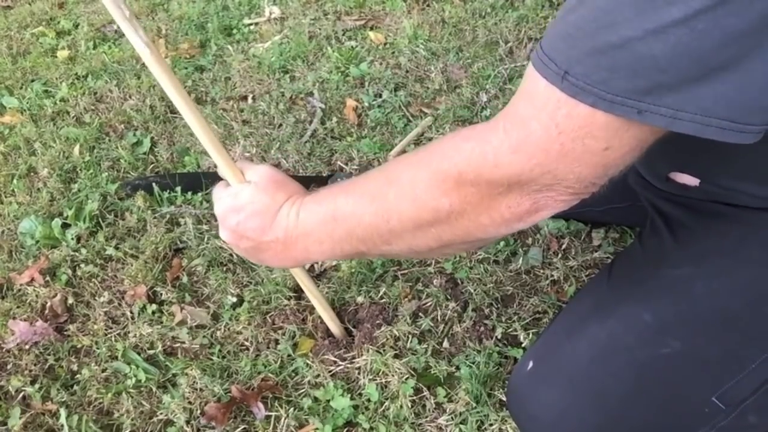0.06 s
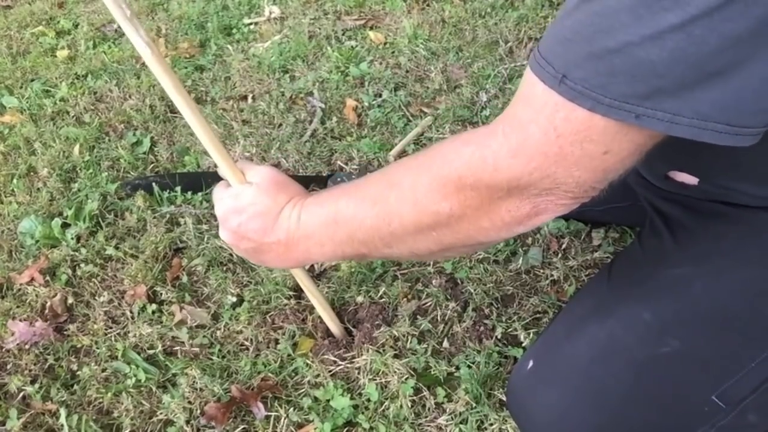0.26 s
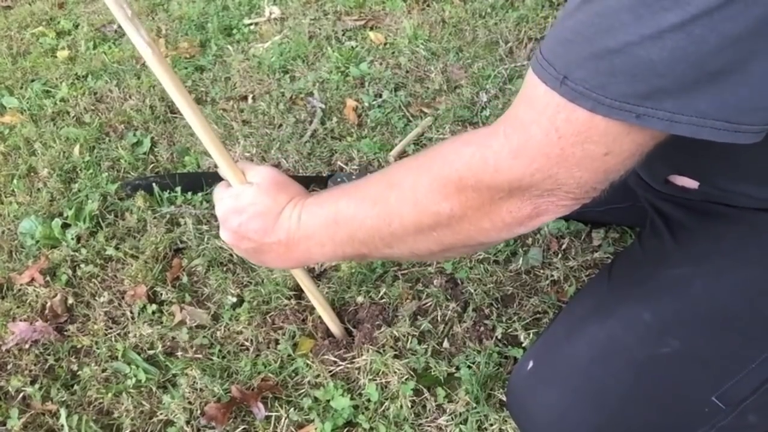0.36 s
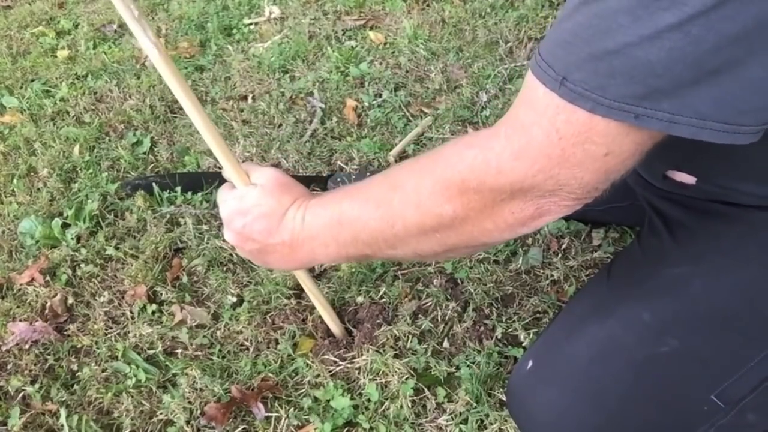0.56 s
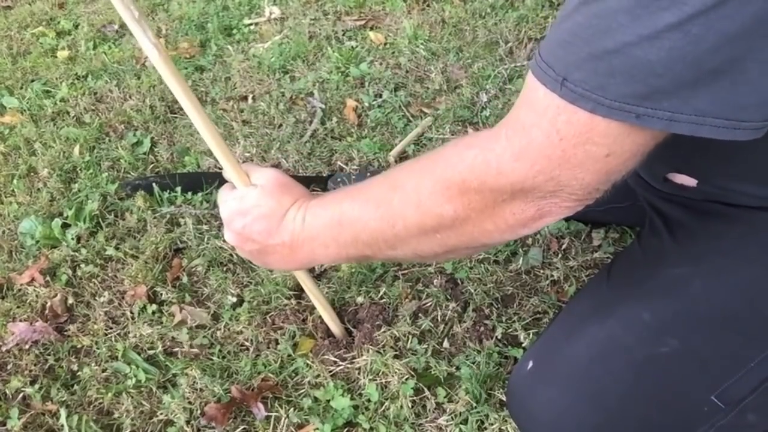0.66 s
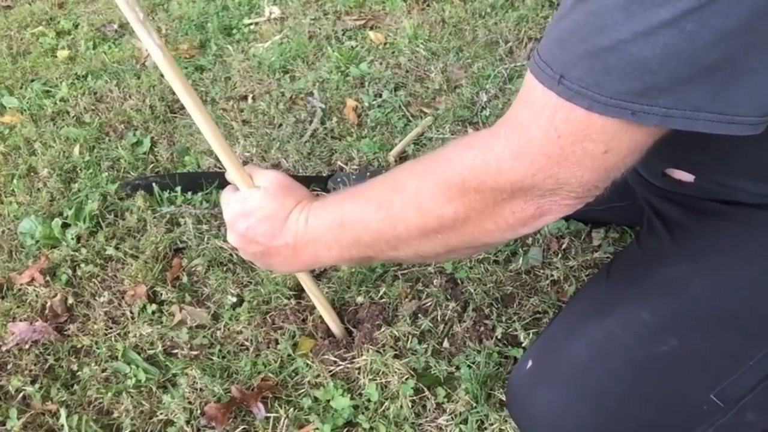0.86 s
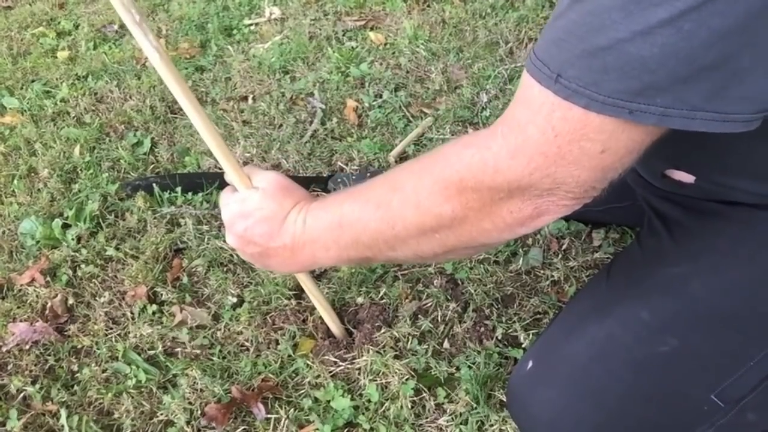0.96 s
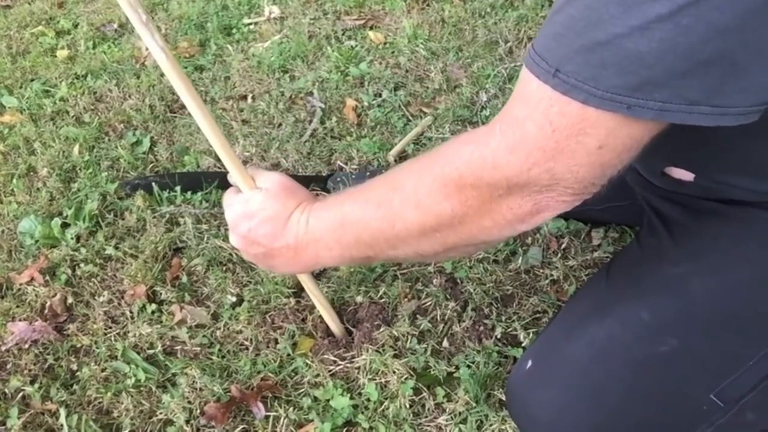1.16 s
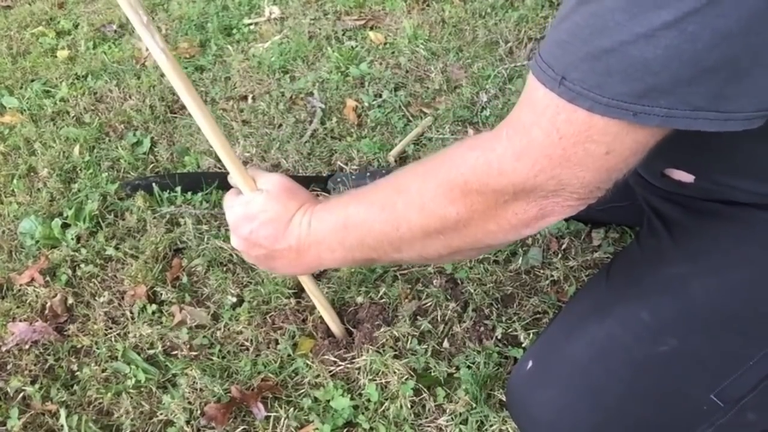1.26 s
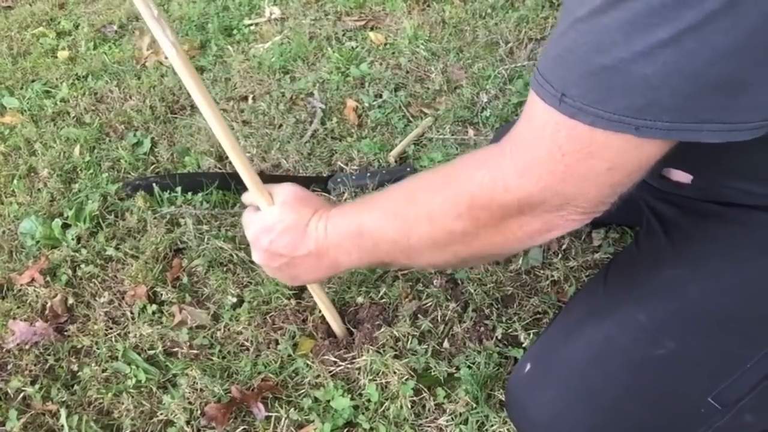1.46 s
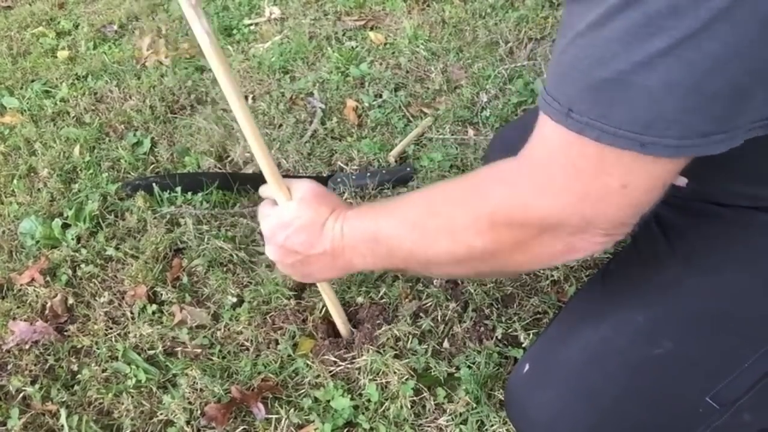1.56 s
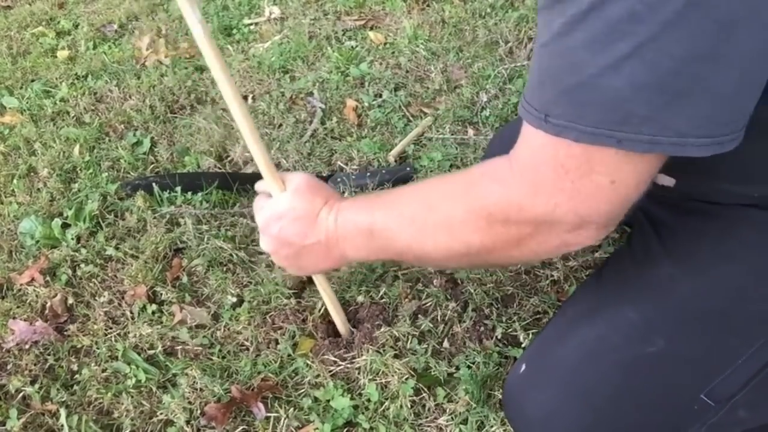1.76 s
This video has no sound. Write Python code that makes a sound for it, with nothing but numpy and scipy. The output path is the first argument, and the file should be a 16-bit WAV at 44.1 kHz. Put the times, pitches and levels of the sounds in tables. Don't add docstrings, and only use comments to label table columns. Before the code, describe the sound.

Four loud dry hammer blows on a wooden stake outdoors, faint rebounds, low gusty wind rumble

```python
import sys
import numpy as np
from scipy import signal
from scipy.io import wavfile
from scipy.ndimage import uniform_filter1d

SR = 44100
rng = np.random.default_rng(int(sys.argv[2]) if len(sys.argv) > 2 else 0)


def pcm_store(signal):
    levels = np.round(np.clip(np.atleast_2d(signal), -1, 1) * 32767)
    wavfile.write(sys.argv[1], SR, levels.astype(np.int16).T)


def volts_from_db(level):
    exponent = np.asarray(level, float) / 20
    return 10 ** exponent


N = 79380


def rms_one(x):
    return x / np.sqrt(np.mean(x ** 2) + 1e-20)


def cut(x, hz, kind, order=2):
    sos = signal.butter(order, np.clip(hz, 10, .45 * SR), kind, fs=SR, output="sos")
    return signal.sosfilt(sos, x)


def level(rows):
    return volts_from_db(np.interp(np.arange(N) / SR, *np.transpose(rows)))


def coloured(spectrum, patchy_db, rate_hz):
    hz, db = np.transpose(spectrum)
    edges_hz = 20 * 2 ** np.arange(0, 10, .5)
    white = rng.standard_normal((2, N + 8000))
    out = 0
    for k, (low, high) in enumerate(zip(edges_hz, edges_hz[1:])):
        knots = rng.standard_normal(200)
        flicker = np.interp(np.arange(N) / SR * rate_hz, np.arange(len(knots)), knots)
        base_db = np.interp(np.log(low * high) / 2, np.log(hz), db, left=-90, right=-90)
        band = cut(white[k % 2], [low, high], "band")[-N:]
        out = out + volts_from_db(base_db + patchy_db * flicker) * band
    return rms_one(out)


# freq_hz, density_db [dB per Hz]
HISS_SPECTRUM = [(290, 4), (500, -10), (1160, -13.5), (2100, -8.5), (4090, -10), (5090, -12.5), (6610, -10),
                 (14700, -24.5), (16000, -29)]
# time_s, level_db
HISS_LEVEL = [(0.0, -43), (0.812, -41.5), (0.912, -43), (1.544, -42.5), (1.8, -41.5)]


def outdoor_hiss():
    return level(HISS_LEVEL) * coloured(HISS_SPECTRUM, patchy_db=-0.67, rate_hz=8.27)


# time_s, level_db
BREEZE_LEVEL = [(0.0, -36), (0.094, -39.5), (0.27, -40), (0.646, -31), (0.776, -40), (0.856, -36),
                (1.016, -27.5), (1.388, -31), (1.604, -35.5), (1.8, -33)]
# freq_hz, density_db [dB per Hz]
BREEZE_SPECTRUM = [(13, -35), (22, 10), (81, 11), (118, 4), (163, -1), (401, -17), (900, -28.5),
                   (1170, -11), (1980, -120)]


def breeze():
    return level(BREEZE_LEVEL) * coloured(BREEZE_SPECTRUM, patchy_db=4.5, rate_hz=20)


def evened(x, window_s):
    evenness = 0.2
    x = rms_one(x)
    power = uniform_filter1d(x ** 2, int(window_s * SR))
    return x / (power + 0.1) ** (evenness / 2)


def lump(t, rise_s, hold_s, tail_s):
    rise = 1 - np.exp(-(t.clip(0) / rise_s) ** 2)
    return rise * np.exp(-(t - hold_s).clip(0) / tail_s)


def eddies(noise, edges_hz, shape, slope_db):
    out = 0
    for k, band_hz in enumerate(zip(edges_hz, edges_hz[1:])):
        band = cut(noise[k % 2], band_hz, "band")[-len(shape):]
        one = evened(band, 2 / band_hz[0]) * shape
        match = np.sqrt(np.sum(shape ** 2) / np.sum(one ** 2))
        out = out + volts_from_db(slope_db * k) * one * match
    return out


THUMP_LOW_HZ, THUMP_TOP_HZ, THUMP_DB = 45.8, 140.4, -9.5
THUMP_RISE_S, THUMP_LAG_S, THUMP_TAIL = .006, 0.0013, 0.44
FLUTTER_LOW_HZ, FLUTTER_TOP_HZ, FLUTTER_DB = 140.7, 680.3, -10.5
FLUTTER_OPENS_HZ_PER_DB = 10.5
FLUTTER_RISE_S, FLUTTER_SHARE, FLUTTER_TAIL = 0.0029, 0.66, .15
# start_s, thump_db, flutter_db, length_s
GUSTS = [(0.104, -23.5, -37, 0.028), (0.132, -22.5, -48, 0.044), (0.207, -15.5, -18.5, 0.023),
         (0.278, -21.5, -63, 0.019), (0.347, -33, -19, 0.024), (0.397, -20, -21.5, 0.019),
         (0.404, -6, -20.5, 0.024), (0.437, -34, -33, 0.021), (0.534, -12, -52, 0.029),
         (0.569, -14, -16, 0.026), (0.639, -32, -21, 0.025), (0.693, -13, -35, 0.023),
         (0.729, -23.5, -36, 0.02), (0.77, -9.5, -12, 0.026), (0.858, -6.5, 1, 0.025),
         (0.919, -10, -14.5, 0.024), (0.954, -19, -16, 0.02), (1.007, -22.5, -20.5, 0.025),
         (1.067, -16.5, -9, 0.025), (1.148, -17, -21.5, 0.02), (1.194, -14, -31.5, 0.031),
         (1.314, -16, -17, 0.029), (1.375, -13.5, -19.5, 0.024), (1.429, -14.5, -19, 0.036),
         (1.456, -9, -7, 0.027), (1.528, -21, -18, 0.029), (1.607, -38, -35.5, 0.031),
         (1.682, -29.5, -24.5, 0.025), (1.714, -35, -41, 0.025)]


def gusts():
    out = np.zeros(N + SR)
    t = np.arange(SR // 5) / SR
    for start_s, thump_db, flutter_db, length_s in GUSTS:
        noise = rng.standard_normal((2, 2 * len(t)))
        thump_shape = lump(t - THUMP_LAG_S, THUMP_RISE_S, length_s, THUMP_TAIL * length_s)
        thump = eddies(noise, np.geomspace(THUMP_LOW_HZ, THUMP_TOP_HZ, 3), thump_shape, slope_db=0.0)

        top_hz = max(FLUTTER_TOP_HZ + FLUTTER_OPENS_HZ_PER_DB * (flutter_db + 4), 300)
        flutter_shape = lump(t, FLUTTER_RISE_S, FLUTTER_SHARE * length_s, FLUTTER_TAIL * length_s)
        flutter = eddies(noise, np.geomspace(FLUTTER_LOW_HZ, top_hz, 4), flutter_shape, slope_db=-3.5)
        flutter = cut(flutter, 1.257 * top_hz, "low", order=6)

        i = int(start_s * SR)
        out[i:i + len(t)] += volts_from_db(thump_db + THUMP_DB) * thump + volts_from_db(flutter_db + FLUTTER_DB) * flutter
    return out[:N]


def crack(t):
    low_hz, top_hz, t60_s, rise_s = 1770, 8600, 0.0094, 0.00041
    noise = cut(rng.standard_normal(len(t)), [low_hz, top_hz], "band", order=1)
    return noise * volts_from_db(-60 * t / t60_s) * (1 - np.exp(-(t / rise_s) ** 2))


MODE_SPREAD_DB, DETUNE, PHASE_SPREAD_RAD = 2.0, .01, .12 * 2 * np.pi
HOLD_S, SWELL_S, SWELL_POWER = 0.0025, 0.0017, 0.5
HEAD_FOLLOWS_CRACK, SQUARE_CRACK_DB = .8, 5
# freq_hz, level_db, t60_s
STAKE_MODES = [(594, -15, .02), (964, -13, .013), (1241, -9.5, 0.012), (1523, -5, 0.0089),
               (1975, -0.5, 0.007), (2291, -11, 0.0073), (2520, -11.5, 0.009), (2916, -12, 0.0091),
               (3600, -13.5, 0.0067), (4470, -11.5, 0.0091), (5040, -23.5, 0.011), (5954, -15, 0.006),
               (6640, -18.5, 0.0067)]
# freq_hz, level_db, t60_s
HEAD_MODES = [(4245, -21, .026), (7630, -26, .028)]


def ringing(t, crack_db, pitch_ratio):
    head_db = HEAD_FOLLOWS_CRACK * min(crack_db - SQUARE_CRACK_DB, 0)
    stake = [(f * pitch_ratio, d, r) for f, d, r in STAKE_MODES]
    head = [(f, d + head_db, r) for f, d, r in HEAD_MODES]
    hz, db, t60_s = np.transpose(stake + head)[:, :, None]
    spread, detune, phase = rng.standard_normal((3, len(hz), 1))

    swell = 1 - np.exp(-(t / (SWELL_S * (2000 / hz) ** SWELL_POWER)) ** 2)
    alternate_rad = np.pi * np.arange(len(hz))[:, None]
    turn_rad = 2 * np.pi * hz * (1 + DETUNE * detune) * t
    waves = np.sin(turn_rad + PHASE_SPREAD_RAD * phase + alternate_rad)
    decay_db = -60 * (t - HOLD_S).clip(0) / t60_s
    return np.sum(volts_from_db(db + MODE_SPREAD_DB * spread + decay_db) * swell * waves, axis=0)


def second_contact(direct):
    lag = int(.0048 * SR)
    late = np.r_[np.zeros(lag), direct[:-lag]]
    return volts_from_db(-16) * cut(late, [2220, 12000], "band", order=1)


def scatter(t):
    level_db, t60_s, lag_s = -30.5, 0.3, 0.0077
    noise = cut(rng.standard_normal(len(t)), [700, 7200], "band", order=1)
    return noise * volts_from_db(level_db - 60 * t / t60_s) * (1 - np.exp(-(t / lag_s) ** 2))


def knock(crack_db, top_hz, pitch_ratio):
    t = np.arange(SR // 6) / SR
    direct = volts_from_db(2) * ringing(t, crack_db, pitch_ratio) + volts_from_db(crack_db - 0.5) * crack(t)
    return cut(direct + second_contact(direct) + scatter(t), top_hz, "low", order=4)


# start_s, level_db, crack_db, top_hz, pitch_ratio
BLOWS = [
    (0.2004, 1.5, 8.5, 13400, 0.98),
    (0.5514, -0.5, 8, 13800, .99),
    (0.887, -1, 0.5, 9600, 1.01),
    (1.2432, 1, 7, 13700, 1),
]
# start_s, level_db, crack_db, top_hz, pitch_ratio
REBOUNDS = [
    (0.5971, -24, 18.5, 5130, 1.03),
    (0.9224, -28, 23, 4070, 1.01),
    (0.9513, -15.5, 14, 4240, 1.04),
    (1.2602, -22, -9.0, 1480, 0.92),
]


def hammer():
    out = np.zeros(N + SR)
    for start_s, level_db, crack_db, top_hz, pitch_ratio in BLOWS + REBOUNDS:
        one = knock(crack_db, top_hz, pitch_ratio)
        i = int(start_s * SR)
        out[i:i + len(one)] += volts_from_db(level_db) * one
    return out[:N]


def scene():
    return (outdoor_hiss() + breeze() + gusts() + hammer())[None]


def roll_off(x):
    return signal.sosfilt(signal.butter(12, 16200, fs=SR, output="sos"), x)


def record(dry):
    ceiling, knee = 1.08, 16
    x = cut(dry, 42.6, "high", order=3) / ceiling
    mix = ceiling * x / (1 + np.abs(x) ** knee) ** (1 / knee)
    return roll_off(mix)


dry = scene()
out = record(dry)
pcm_store(out)
```